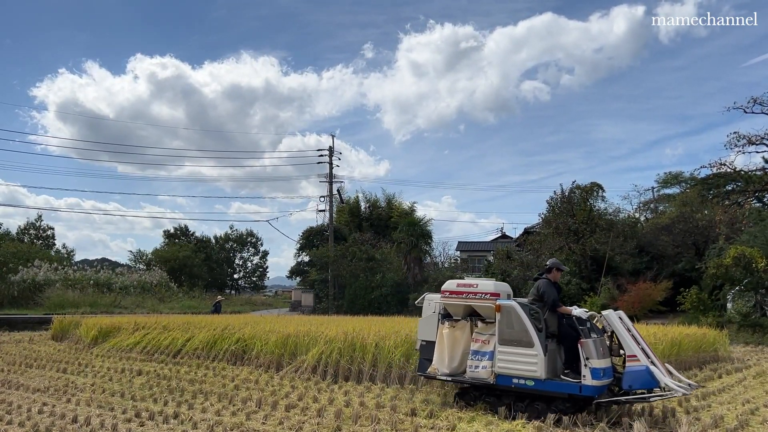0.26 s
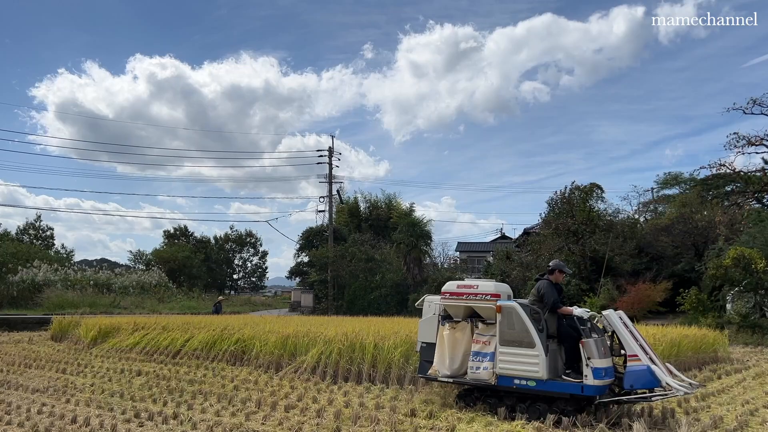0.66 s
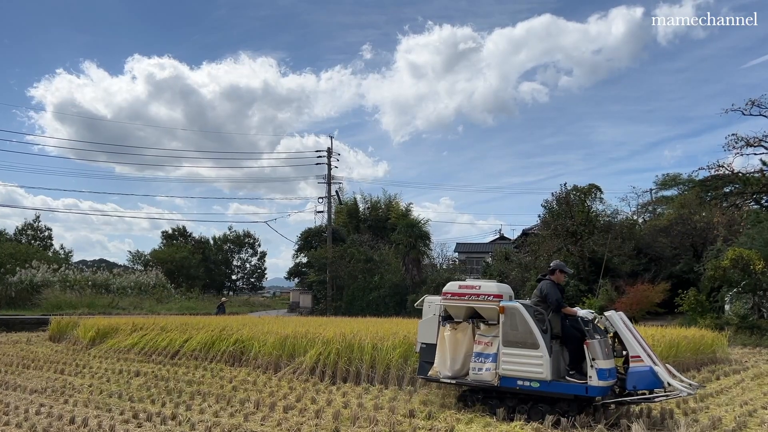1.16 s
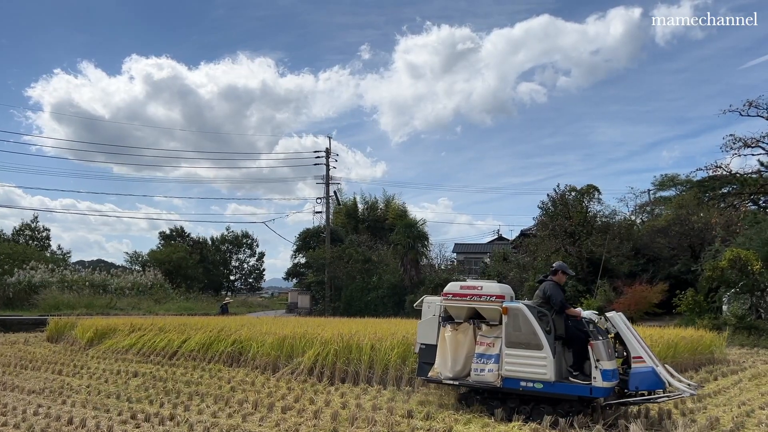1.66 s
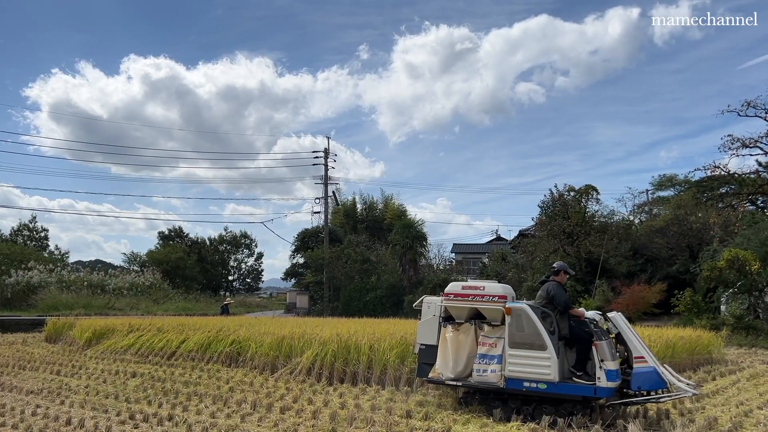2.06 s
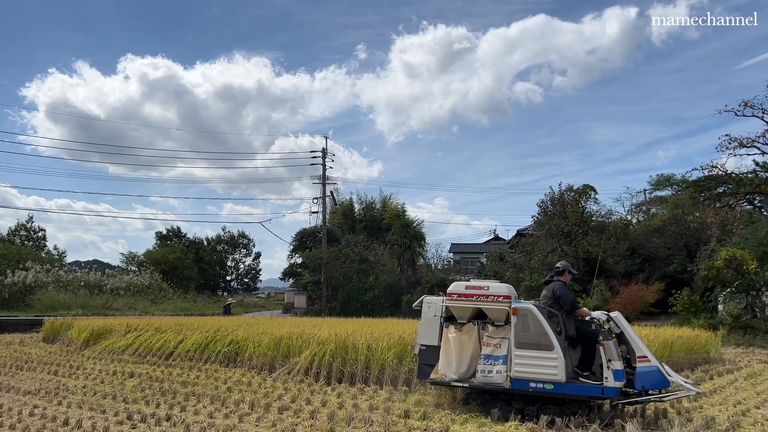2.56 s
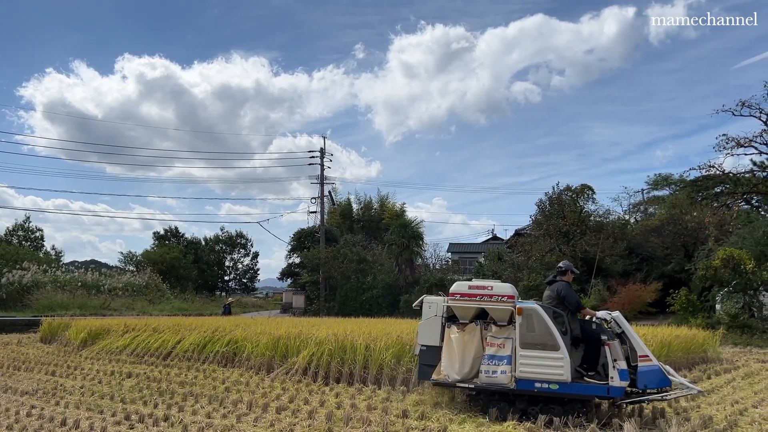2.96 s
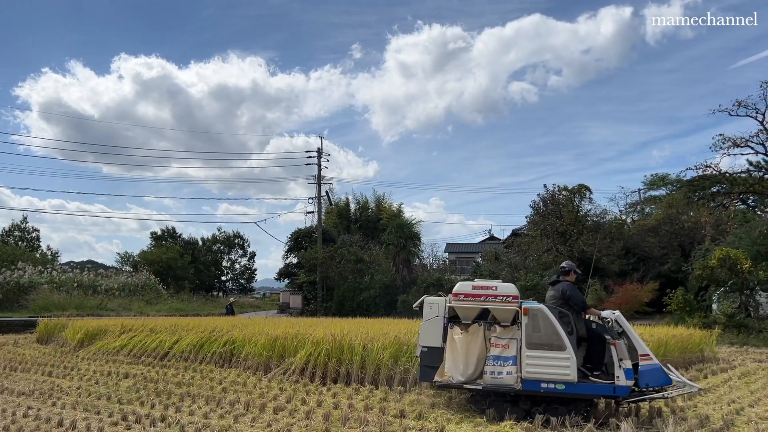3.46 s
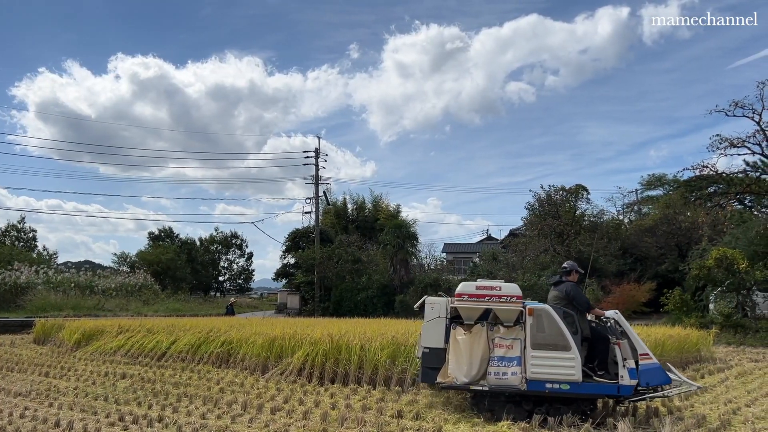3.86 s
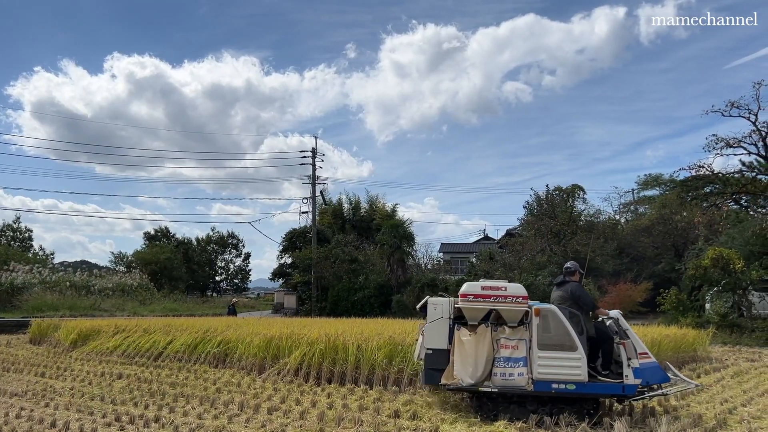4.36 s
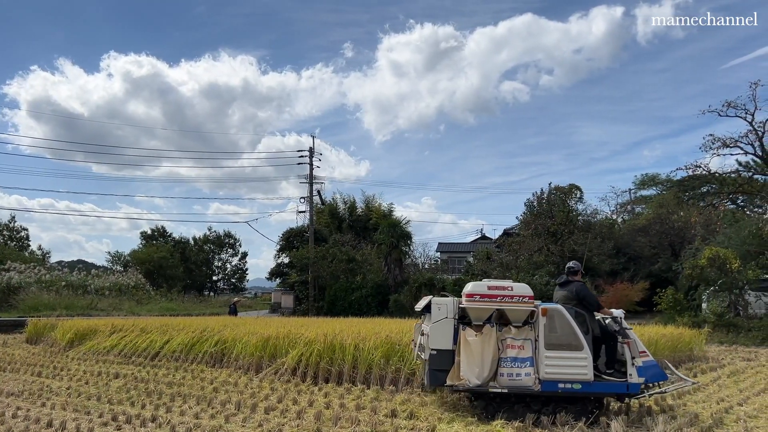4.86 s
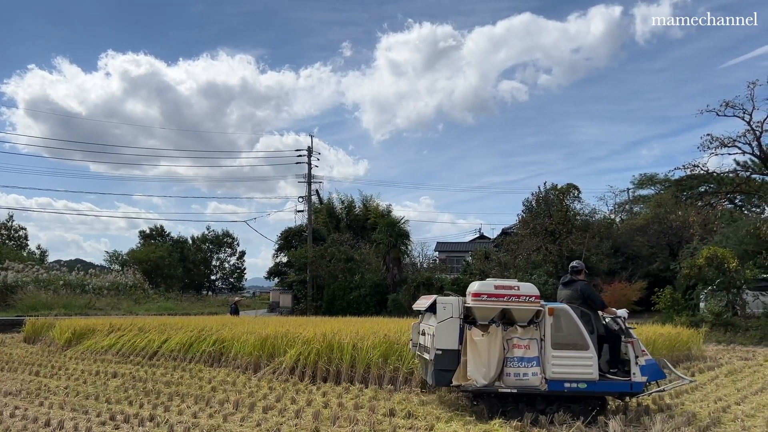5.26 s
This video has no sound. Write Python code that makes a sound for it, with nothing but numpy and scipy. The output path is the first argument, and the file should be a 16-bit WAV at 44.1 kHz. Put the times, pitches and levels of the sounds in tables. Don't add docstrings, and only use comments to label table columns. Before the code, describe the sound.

A small diesel harvester drones and roars steadily while cutting rice, straw hissing with quick faint ticks, as wind thumps and buffets the microphone.

```python
import sys
import numpy as np
from scipy import signal
from scipy.fft import rfft, irfft, next_fast_len
from scipy.io import wavfile
from scipy.ndimage import uniform_filter1d, map_coordinates

SR = 44100
rng = np.random.default_rng(int(sys.argv[2]) if len(sys.argv) > 2 else 0)


def int16_out(signal):
    q = np.round(np.clip(np.atleast_2d(signal).T, -1, 1) * 32767)
    wavfile.write(sys.argv[1], SR, q.astype(np.int16))


def invert_db(x):
    u = np.asarray(x, float) / 20
    return 10 ** u


N = 243431


def unit(x):
    return x / np.sqrt(np.mean(x ** 2) + 1e-20)


def curves(rows):
    s, *cols = np.transpose(rows)
    return [np.interp(np.arange(N) / SR, s, c) for c in cols]


def wobble(rate_hz):
    knots = rng.standard_normal(int(N * rate_hz / SR) + 4)
    return map_coordinates(knots, [np.arange(N) * rate_hz / SR])


def per_sample(coarse):
    return np.interp(np.arange(N), np.arange(0, N, 128), coarse)


def bump(centre_s, half_s):
    coarse_s = np.arange(0, N, 128) / SR
    return np.exp(-((coarse_s - centre_s) / half_s) ** 2)


def turned():
    return np.arange(N) / N


def patchy(depth_db):
    spectra = signal.stft(rng.standard_normal((2, N)), nperseg=512)[2]
    field = rng.standard_normal(spectra.shape[1:])
    field = uniform_filter1d(field, size=6, axis=0)
    field = uniform_filter1d(field, size=10, axis=1)
    return signal.istft(spectra * invert_db(depth_db * unit(field)), nperseg=512)[1][:, :N]


def ports(pair, table):
    m = next_fast_len(N + 8192)
    at = np.log(np.fft.rfftfreq(m, 1 / SR) + 1)
    hz, *cols = np.transpose(table)
    knots = np.log(hz + 1)
    outside = (-120, -120, 0, 0)
    sum_db, diff_db, lean, lead = [np.interp(at, knots, c, left=e, right=e) for c, e in zip(cols, outside)]
    direct, scattered = rfft(pair, m)
    tied = lean + 1j * lead
    untied = np.sqrt(np.clip(1 - abs(tied) ** 2, 0, 1))
    mid = invert_db(sum_db) * direct
    side = invert_db(diff_db) * (tied * direct + untied * scattered)
    left_right = irfft(np.array([mid + side, mid - side]), m)[:, :N]
    return left_right / np.sqrt(np.mean(invert_db(2 * sum_db)))


def bursts(times_s, levels_db, t60):
    starts = np.bincount(np.round(times_s * SR).astype(int), invert_db(levels_db), N)[:N]
    t = np.arange(SR // 20) / SR
    shape = invert_db(-60 * t / t60) * (1 - np.exp(-t / 0.00051))
    return abs(signal.fftconvolve(starts, shape)[:N])


def machine():
    # start_s, firing_hz, hum_db
    engine = [(0, 68, -25), (.3, 67.24, -28.5), (.7, 66.34, -35.5), (1.4, 66.87, -29), (1.85, 66.8, -35),
              (2.0, 67.2, -27), (2.2, 67.2, -32), (2.36, 66.7, -37.5), (2.55, 66.92, -32.5),
              (3.05, 66.84, -33), (3.22, 66.65, -28.5), (3.38, 66.46, -25), (3.65, 67.05, -28),
              (4.05, 66.64, -26), (4.3, 66.9, -31), (4.65, 67.07, -24.5), (5.0, 67.15, -27),
              (5.52, 67.1, -25.5)]
    # multiple, level_db (against the hum)
    harmonics = [(2, -14)]
    # pitch_hz, level_db (rms), wander_hz
    tone_rows = [(86, -38, 1), (227, -48, 2), (386, -53, 3), (690, -58, 3), (1156.5, -58, 1),
                 (1826, -58, 5), (1932, -56.5, 10), (2763, -66, 8)]
    # pitch_hz, sum_db, difference_db, left_lean (-1..1), lead (-1..1)
    body = [(151, -56, -40, 0, 0), (315, 3.5, -3, -0.12, -0.48), (444, -2, -12, 0, -0.35),
            (855, 0.5, -7.5, -1, 0), (920, -0.5, -24, -0.12, .2), (1340, -6.5, -10, 0.098, -.6),
            (1464, -2.5, -10.5, -0.74, -0.32), (1930, -1, -15.5, -0.065, -.5),
            (2000, -5.5, -10, 0.11, -0.6), (2240, -3.5, -13, -0.6, .3), (2805, -9.5, -16, 0.31, .1),
            (3230, -15.5, -17, 0.26, -.4), (3570, -13.5, -21, 0.55, 0), (4150, -29.5, -52, 0, 0)]
    firing_hz, hum_db = curves(engine)
    phase = 2 * np.pi * np.cumsum(firing_hz) / SR
    hum = np.sin(phase)
    for multiple, db in harmonics:
        hum = hum + invert_db(db + 2.5 * wobble(11)) * np.sin(multiple * phase)
    tones = np.zeros(N)
    for hz, db, wander_hz in tone_rows:
        tone_phase = 2 * np.pi * np.cumsum(hz + wander_hz * wobble(6)) / SR
        tones += invert_db(db + 3.94 * wobble(11)) * np.sin(tone_phase)
    lines = np.sqrt(2) * (invert_db(hum_db + 0.04 + 1.2 * wobble(5.9)) * hum + tones)
    throb_db = 0.25 * np.cos(phase) + 0.12 * np.cos(phase / 3) + 0.087 * wobble(12)
    roar = ports(invert_db(throb_db) * patchy(depth_db=0.73), body)
    roar_db = -37 - 0.5 * turned()
    return lines * invert_db([[-.1], [.1]]) + invert_db(roar_db) * roar


def fourth_harmonic():
    turn_s, turn_takes_s = 2.95, .2
    exposed = 1 / (1 + np.exp((turn_s - np.arange(N) / SR) / turn_takes_s))
    level_db = -50 + 6 * exposed + 2.6 * wobble(18)
    phase = 2 * np.pi * np.cumsum(269.3 + 3 * wobble(10)) / SR
    return np.sqrt(2) * invert_db(level_db) * np.sin(phase)


def rattle():
    # pitch_hz, spread (share of the pitch)
    panels = [(850, 0.1287), (1850, 0.097)]
    draws = rng.random((900, 3))
    t = np.arange(SR // 25) / SR
    centre_hz, spread = np.array(panels)[np.arange(len(draws)) % len(panels)].T
    hz = centre_hz * np.exp(spread * 3 * (draws[:, 1] - .5))
    envelope = invert_db(-9 * draws[:, [2]] - 60 * t / 0.14) * (1 - np.exp(-t / 0.001))
    rings = envelope * np.sin(2 * np.pi * hz[:, None] * t)
    where = (draws[:, [0]] * N).astype(int) + np.arange(len(t))
    knocked = np.bincount(where.ravel(), rings.ravel(), N)[:N]
    return invert_db(-49.5) * unit(knocked) * invert_db([[-1.2], [1.2]])


def cutter():
    # first_s, strikes_hz
    cam = (.0421, 23.03)
    # start_s, peak_db
    snap_rows = [(0.179, -39), (0.2009, -37), (0.2643, -33), (1.0814, -39), (1.1248, -35), (1.237, -31),
                 (1.4306, -37), (1.8776, -34), (2.1685, -37), (2.2762, -37), (2.6283, -37), (2.8184, -30),
                 (2.9068, -37), (2.9946, -33), (3.9496, -34), (3.9933, -39), (4.0802, -35), (4.1235, -34),
                 (4.2093, -37), (4.4677, -42), (4.557, -32), (4.6339, -31), (4.792, -33), (4.8165, -32),
                 (4.9023, -34), (4.9477, -40), (5.0779, -42), (5.236, -36), (5.2654, -36)]
    # centre_s, swell_db
    bunches = [(.75, 2.5), (1.81, 1.5), (3.0, 0.5), (3.75, -2.5), (4.08, 2), (4.55, 0)]
    # pitch_hz, sum_db, difference_db, left_lean (-1..1), lead (-1..1)
    chaff_rows = [(9000, -40, -30, 0, 0), (10430, -32.5, -8, 0, 0), (11060, -10.5, -5, 0, .4),
                  (11270, -6, -6, 0, .5), (11400, -3.5, -13, 0, .3), (11650, -1.5, -14.5, 0, .3),
                  (12500, -2.5, -17, 0, 0), (13000, -3, -32, 0, 0), (14600, -6.5, -32, 0, 0),
                  (15100, -8, -17, 0, 0), (16300, -9, -21.5, 0, 0)]
    straw_rows = [(3470, -27, -20, 0, 0), (3860, -8, -3, .1, -.1), (4040, 4.5, -7, -0.27, -.1),
                  (4360, 3, -5, -0.47, -.15), (4710, -2.5, -8, -0.41, .1), (5080, 0, -1.5, -.2, .5),
                  (5620, -7, -6, -.14, .1), (5700, -6, 0, -.1, 0), (6300, -2, -10, .6, -.15),
                  (7200, -2.5, -7, 0.56, -.45), (8350, -2.5, -4, 0.43, -.65), (8880, -10, -4.5, 0, -.2),
                  (9770, -27.5, -7, 0, 0), (11000, -40, -28, 0, 0)]
    crop_db = per_sample(sum(db * bump(s, half_s=0.14) for s, db in bunches))
    chaff_db = -51.5 + 2.5 * turned() ** 2.2 + 0.71 * crop_db
    straw_db = -54.5 + 2 * turned() + 0.7 * crop_db
    first_s, strikes_hz = cam
    strikes_s = np.arange(first_s, N / SR, 1 / strikes_hz)
    strength = np.clip(rng.standard_normal(len(strikes_s)), -2, 1.2)
    ticks = bursts(strikes_s, 3.4 + 2.7 * strength, t60=0.033)
    grains = rng.random((500, 2))
    rustle = bursts(grains[:, 0] * N / SR, -2 + 7 * grains[:, 1], t60=.012)
    s, db = np.transpose(snap_rows)
    hiss_there_db = chaff_db[np.round(s * SR).astype(int)]
    snaps = bursts(s, db - hiss_there_db - 4, t60=0.021)
    swell = invert_db(0.41 * wobble(18) + 0.48 * wobble(40))
    knocks = np.hypot(ticks, snaps)
    chaff_gain = np.sqrt(swell ** 2 + rustle ** 2 + knocks ** 2)
    straw_gain = np.sqrt(swell ** 2 + .4 * rustle ** 2 + .25 * knocks ** 2)
    chaff = ports(chaff_gain * patchy(depth_db=1.0), chaff_rows)
    straw = ports(straw_gain * patchy(depth_db=.6), straw_rows)
    return invert_db(chaff_db - 0.46) * chaff + invert_db(straw_db + 3.0) * straw


def stirring(steady_db, order):
    # centre_s, level_db, half_s, fineness (0 heave, 1 buffet, 2 flutter)
    eddy_rows = [(0.0, -27, 0.032, 0), (.18, -22, 0.02, 1), (.58, -29, 0.091, 0),
                 (.745, -25.5, 0.072, 1.47), (.94, -33, 0.022, 1.85), (1.09, -25, 0.026, 1.5),
                 (1.32, -29.5, 0.039, 0.62), (1.54, -25.5, 0.027, 0.71), (1.75, -31.5, 0.034, 1.9),
                 (1.82, -33, 0.034, .4), (2.09, -26, .03, 1.4), (2.19, -29.5, 0.031, 0.3),
                 (2.235, -23, 0.042, 1.38), (2.43, -32, 0.026, 2), (2.56, -46, 0.035, 0.36),
                 (2.96, -32, 0.053, 1.6), (3.13, -30, 0.1, 1.5), (3.39, -28.5, 0.027, 1.5),
                 (3.53, -21.5, 0.032, 0.79), (3.88, -21.5, 0.038, 0.65), (4.1, -28.5, 0.092, 0.37),
                 (3.97, -25.5, 0.05, 1.7), (4.4, -23.5, 0.028, 1.16), (4.44, -27, 0.083, 0.27),
                 (4.66, -23, 0.064, 1.47), (4.7, -29, 0.02, 0.041), (4.745, -20, 0.014, 1.4),
                 (5.05, -35, .04, 2), (5.13, -28.5, 0.028, 0.73), (5.19, -32, 0.023, 1.44)]
    power = 0
    for s, db, half_s, fineness in eddy_rows:
        spill_db = 14.5 * (fineness - order) ** 2
        power = power + invert_db(2 * (db - spill_db)) * bump(s, half_s)
    return np.sqrt(invert_db(2 * steady_db) + per_sample(power))


def evened(pair, span_s):
    power = uniform_filter1d(np.mean(pair ** 2, axis=0), size=round(span_s * SR))
    return pair / np.sqrt(abs(power) + 1e-3)


def wind():
    # start_s, level_db
    strength = [(0, -26), (.3, -26), (.85, -26.5), (1.0, -34), (1.2, -36), (1.45, -29), (2.1, -28),
                (2.36, -37), (2.52, -33), (2.7, -31.5), (2.9, -36.5), (3.2, -28.5), (3.75, -28.5),
                (4.1, -25), (4.5, -27.5), (4.85, -29), (5.05, -32), (5.52, -27)]
    # pitch_hz, sum_db, difference_db, left_lean (-1..1), lead (-1..1)
    heave_rows = [(18, -43, -57, 0, 0), (33.3, -21, -25, 0.0039, 0), (56.6, -1.5, -14, 0, 0),
                  (66, 0.5, -16, 0, 0), (85.4, -17, -40, 0, 0)]
    buffet_rows = [(62, -17, -31, 0, 0), (75.8, -0.5, -11.5, 0.0048, 0), (120, -8.5, -19, 0, 0),
                   (189, -15.5, -24.5, 0, 0), (310, -34, -48, 0, 0)]
    flutter_rows = [(100, -31, -33, 0, 0), (197.3, 0, -6.5, 0, 0), (280, -2, -10.5, 0, 0),
                    (405, -8, -21, 0.004, 0), (542, -21.5, -18, 0, 0), (765, -29, -65, 0, 0)]
    wind_db, = curves(strength)
    calm_db = wind_db.mean()
    gust_db = wind_db - calm_db
    heave_gain = stirring(calm_db - 8.5 + 0.74 * gust_db, order=0)
    buffet_gain = stirring(wind_db, order=1)
    flutter_gain = stirring(calm_db - 7.5 + 0.56 * gust_db, order=2)
    lumps_db = wobble(30)
    heave_noise = rng.standard_normal((2, N))
    buffet_noise = invert_db(0.89 * lumps_db) * rng.standard_normal((2, N))
    flutter_noise = unit(invert_db(0.52 * lumps_db + 3.4 * wobble(70)) * rng.standard_normal((2, N)))
    heave = evened(ports(heave_noise, heave_rows), span_s=0.057)
    buffet = evened(ports(buffet_noise, buffet_rows), span_s=0.085)
    flutter = evened(ports(flutter_noise, flutter_rows), span_s=0.075)
    return invert_db(4.5) * heave_gain * heave + invert_db(-0.65) * buffet_gain * buffet + invert_db(-2.5) * flutter_gain * flutter


def air_pops():
    # start_s, peak_db, pitch_hz
    pop_rows = [(0.284, -10.5, 110), (0.322, -24, 155), (0.51, -13.5, 109), (0.58, -11, 124),
                (0.658, -11.5, 106.6), (0.691, -11.5, 106), (0.717, -10.5, 146), (0.758, -7.5, 110),
                (0.823, -12.5, 108), (1.108, -20, 112), (1.799, -15.5, 110), (2.112, -12.5, 171),
                (2.167, -18.5, 185), (2.228, -8.5, 166.2), (2.73, -20.5, 107.7), (3.037, -22, 110),
                (3.071, -14, 175.7), (3.361, -15, 109.9), (3.513, -19, 191.5), (3.833, -12, 240),
                (3.86, -15, 90.3), (3.923, -12, 111), (3.982, -13, 250), (1.08, -18, 150.3),
                (4.437, -16, 158), (4.622, -18, 205), (4.664, -9.5, 108), (4.714, -12.5, 122),
                (4.739, -12, 111), (5.128, -25, 110.1)]
    pops = np.zeros(N + SR)
    t = np.arange(SR // 20) / SR
    for s, db, hz in pop_rows:
        cycles = hz * t
        envelope = np.exp(-(cycles - 1) ** 2 / 0.33)
        wave = np.sin(2 * np.pi * cycles) + 0.19 * np.sin(2 * np.pi * 2.764 * cycles)
        pops[round(s * SR):][:len(t)] += invert_db(db - 3.5) * envelope * wave
    return pops[:N] * invert_db(1.5 * wobble(4.6) * [[1], [-1]])


def bird():
    # start_s, level_db, pitch_hz, length_s
    chip = [
        (2.7, -42.5, 4850, .028),
        (2.7, -49, 4250, .045),
        (2.735, -49, 4850, .018),
        (4.655, -44, 3430, .02),
    ]
    notes = np.zeros(N)
    hoarse = 1 + .45 * wobble(500)
    for s, db, hz, length_s in chip:
        t = np.arange(round(length_s * SR)) / SR
        falling = np.sin(2 * np.pi * hz * t * (1 - 0.39 * t))
        notes[round(s * SR):][:len(t)] += invert_db(db) * np.sin(np.pi * t / length_s) * falling
    return hoarse * np.array([invert_db(2) * notes, invert_db(-2) * np.roll(notes, 2)])


def scene():
    return machine() + fourth_harmonic() + rattle() + cutter() + wind() + air_pops() + bird()


def band_limit(x):
    return signal.sosfilt(signal.butter(12, 15970, fs=SR, output="sos"), x)


def record(dry):
    passed = np.fft.rfftfreq(N, 1 / SR) < 15790
    band = irfft(rfft(dry) * passed, N)
    return band_limit(band)


dry = scene()
out = record(dry)
int16_out(out)
```